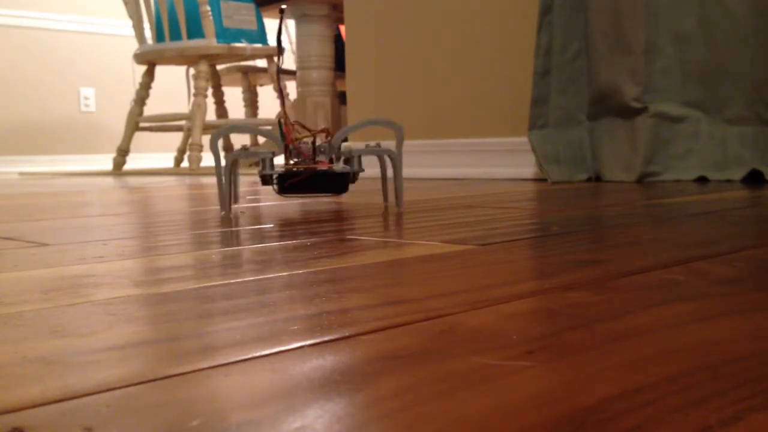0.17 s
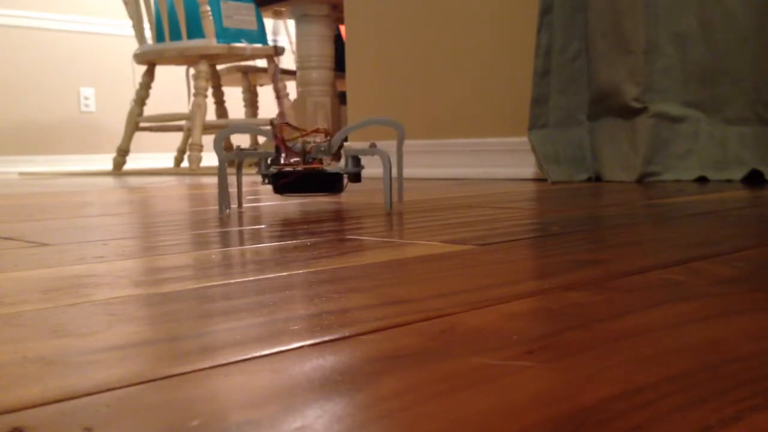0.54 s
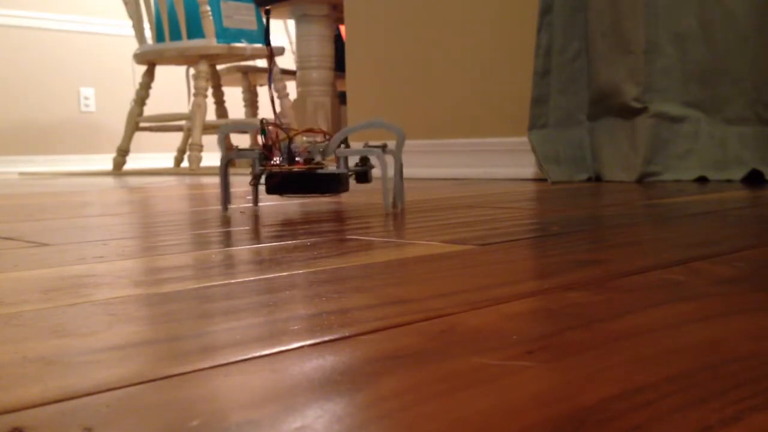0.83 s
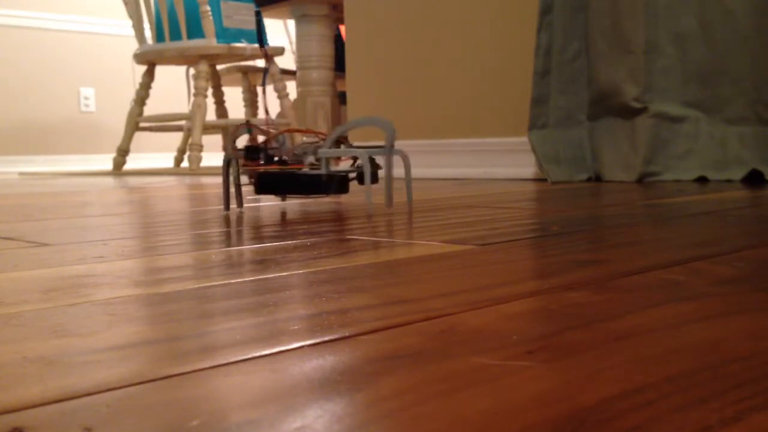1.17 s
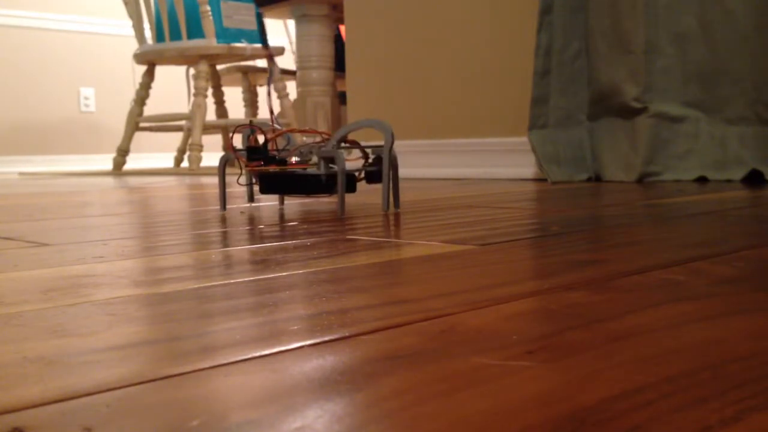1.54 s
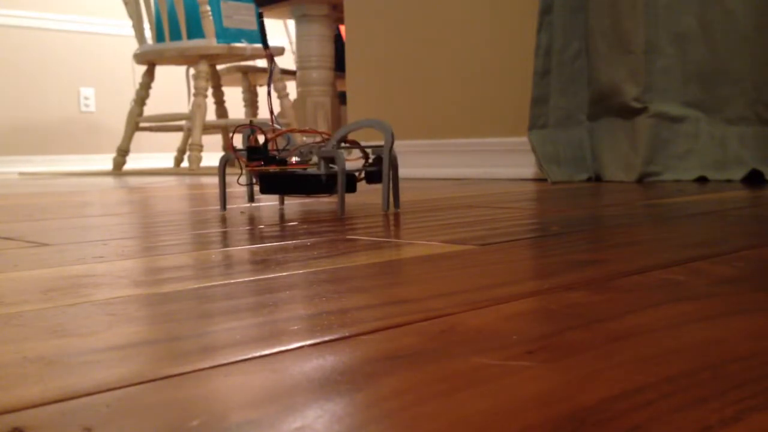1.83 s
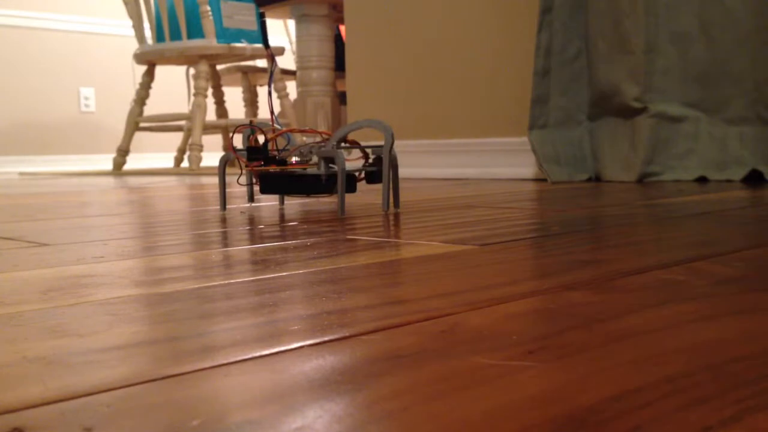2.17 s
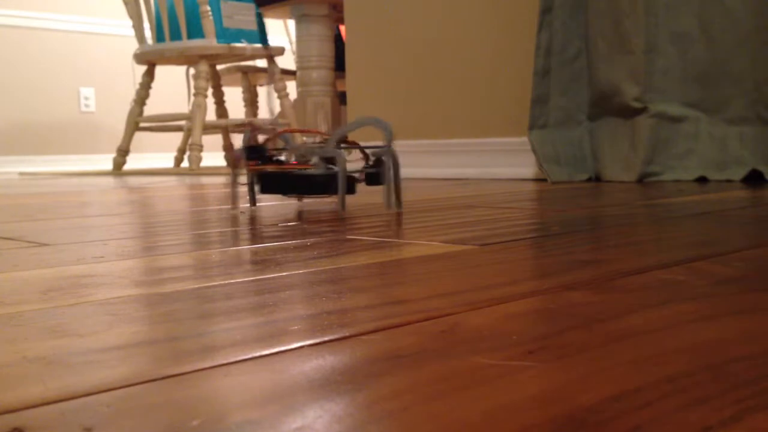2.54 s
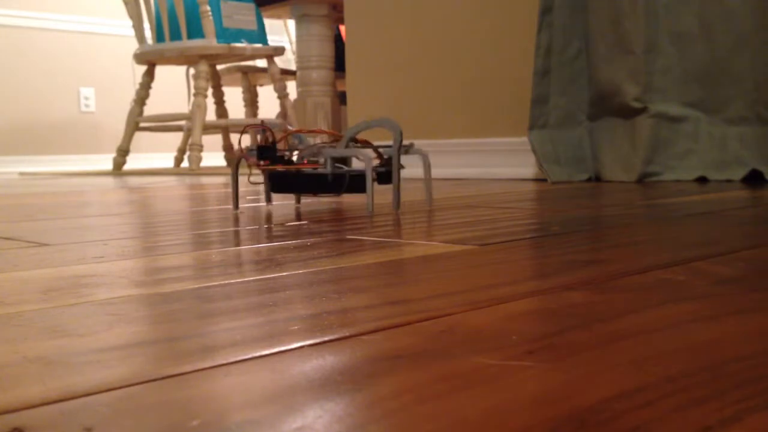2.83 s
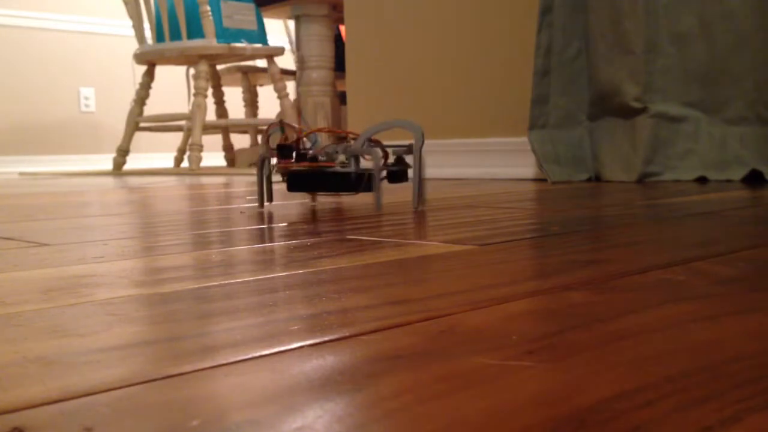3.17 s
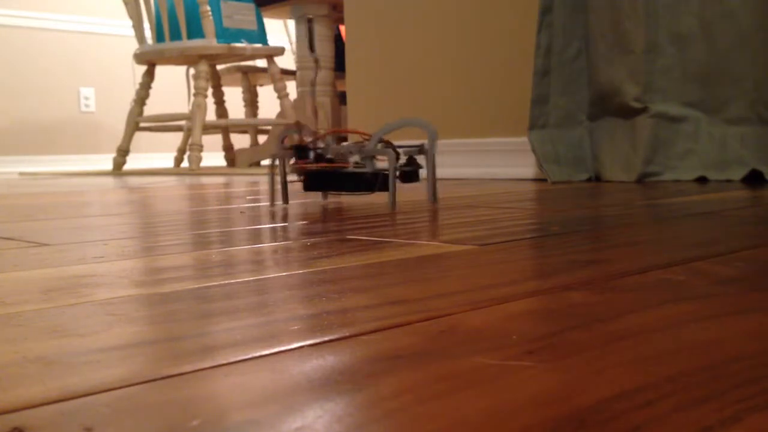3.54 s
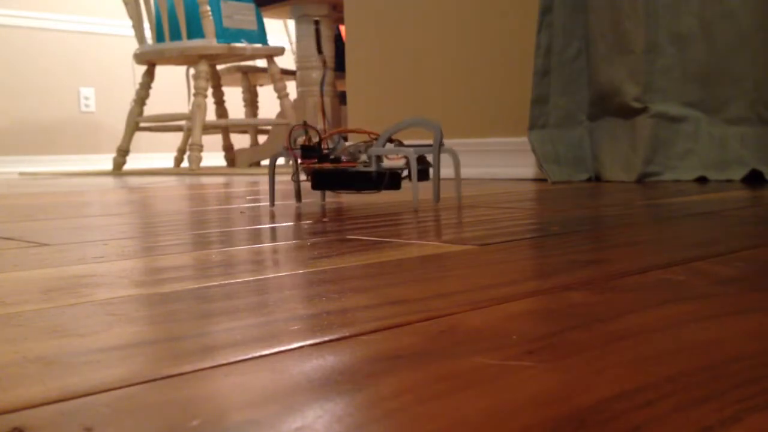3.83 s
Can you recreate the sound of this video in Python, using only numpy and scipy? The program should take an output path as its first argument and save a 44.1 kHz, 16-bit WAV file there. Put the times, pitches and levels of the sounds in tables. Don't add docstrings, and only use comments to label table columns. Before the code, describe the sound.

Small walking robot's servos whir in quick rasping, hissing bursts with a high whine; a short ticking pause, then louder strokes with foot taps and scrapes on a wooden floor, indoors, a metre or two from the microphone.

```python
import sys
import numpy as np
from scipy import signal
from scipy.fft import rfft, irfft, next_fast_len
from scipy.io import wavfile
from scipy.ndimage import uniform_filter1d, map_coordinates

SR = 44100
rng = np.random.default_rng(int(sys.argv[2]) if len(sys.argv) > 2 else 0)


def wrap_up_sound(samples):
    columns = np.atleast_2d(samples).T
    tamed = np.clip(columns, -1, 1)
    steps = np.round(tamed * 32767).astype(np.int16)
    wavfile.write(sys.argv[1], SR, steps)


def nominal_scale(level):
    x = np.asarray(level, float) / 20
    return 10 ** x


N = 176400
T = np.arange(N) / SR
ATTACK_S, RELEASE_S = 0.011, 0.011


def unit(x):
    return x / np.sqrt(np.mean(np.abs(x) ** 2) + 1e-20)


def along(points, hz):
    f, v = np.transpose(points)
    return np.interp(np.log(hz + 1), np.log(f + 1), v)


def wobble(rate):
    knots = rng.standard_normal(4 * 400 + 9)
    return map_coordinates(knots, [T * np.clip(rate, 0, 399)])


def filtered(x, response):
    m = next_fast_len(N + SR // 2)
    return irfft(rfft(x, m) * response(np.fft.rfftfreq(m, 1 / SR)), m)[..., :N]


def body(peaks):
    def response(f):
        total = 0
        for k, (hz, width, db) in enumerate(peaks):
            total = total + (-1) ** k * nominal_scale(db) * 1j * f * width / (hz * hz - f * f + 1j * f * width)
        return total
    return response


def grit(spiky_db, patchy_db):
    contacts = rng.standard_normal(N) * nominal_scale(spiky_db * rng.standard_normal(N))
    z = signal.stft(contacts, nperseg=256)[2]
    patches = uniform_filter1d(rng.standard_normal(z.shape), size=3, axis=0)
    patches = uniform_filter1d(patches, size=4, axis=1)
    return signal.istft(z * nominal_scale(patchy_db * unit(patches)), nperseg=256)[1][:N]


def gate(start, length, attack, release):
    return np.clip((T - start) / attack, 0, 1) * np.exp(-np.clip(T - start - length, 0, None) / release)


def air():
    # pitch_hz, level_db
    colour = [(18, -49), (30, -16.5), (123, -4.5), (219, -11.5), (399, -15), (767, -27.5), (2130, -28),
              (3230, -31), (15500, -38)]
    # pitch_hz, level_db
    hum = [(60, -67.5), (91.5, -63), (119, -61)]
    out = nominal_scale(-56) * unit(filtered(grit(0, 0.79), lambda f: nominal_scale(along(colour, f))))
    for hz, db in hum:
        drift = 1.05 * wobble(8)
        out += nominal_scale(db + 4 + 3.9 * wobble(9.44)) * np.sin(2 * np.pi * hz * T + drift)
    return out


def holding():
    frame_s = .02
    # start_s, pitch_hz, level_db
    ticks = [(.0122, 6800, -62), (.0189, 6800, -65), (.0189, 9700, -62)]
    out = np.zeros(N)
    for s, hz, db in ticks:
        t = (T - s) % frame_s
        frame = ((T - s) // frame_s).astype(int) + 1
        size = rng.standard_normal(203)[frame]
        ring = np.sin(2 * np.pi * hz * t) * np.exp(-t / 0.0011) * (1 - np.exp(-t / 0.00063))
        out += nominal_scale(db + 6.1 * size) * ring
    return out


def thuds():
    # start_s, level_db, pitch_hz
    drops = [
        (1.151, -38, 109.8),
        (1.194, -41, 70),
        (1.222, -32.5, 126),
        (2.517, -32.5, 139),
        (3.954, -44, 329),
    ]
    cycles = 0.63
    out = np.zeros(N)
    for s, db, hz in drops:
        fade = (T > s) * np.exp(-np.abs(T - s) * hz / cycles)
        out += nominal_scale(db) * np.sin(2 * np.pi * hz * (T - s)) * fade
    return out


def taps():
    # start_s, level_db, pitch_hz, time to fall 60 dB fade_s
    contacts = [(.64, -53.5, 850, .1), (.702, -43, 1970, 0.026), (1.034, -50.5, 1105, .06),
                (1.182, -42.5, 1370, 0.027), (1.349, -40, 1964, 0.028), (2.762, -53, 1388, .05),
                (2.861, -52, 800, .06), (3.01, -46, 1344, .08), (3.224, -48, 1970, .05),
                (3.258, -48, 943, 0.048), (3.34, -45.5, 958, 0.079), (3.352, -43, 513, 0.078),
                (3.5, -41, 2030, 0.034), (3.513, -46, 1275, .06), (2.51, -33.5, 2453, 0.078)]
    out, t = np.zeros(N + SR), np.arange(SR // 4) / SR
    for s, db, hz, t60 in contacts:
        ring = np.sin(2 * np.pi * hz * t)
        ring += 0.51 * np.sin(2 * np.pi * .7 * hz * t)
        ring += 0.32 * np.sin(2 * np.pi * 1.6 * hz * t)
        click = 0.84 * uniform_filter1d(rng.standard_normal(len(t)), size=5)
        hit = ring * (1 - np.exp(-t / 0.00033)) + click
        out[round(s * SR):][:len(t)] += nominal_scale(db - 60 * t / t60) * hit
    return out[:N]


def scrapes():
    # start_s, length_s, level_db, brightness in dB per octave tilt_db
    drags = [
        (1.188, .012, -41.5, -2.5),
        (1.208, 0.029, -48, 0),
        (2.077, .08, -62, 0.5),
        (2.475, 0.022, -34.5, -5),
        (2.508, 0.016, -32, 3),
        (2.532, 0.043, -38, 3),
        (2.591, 0.037, -37, -1.5),
        (2.628, 0.06, -47.5, 0.5),
        (2.937, 0.088, -57.5, -1.5),
        (3.866, 0.11, -53.5, 0),
    ]
    # pitch_hz, width_hz, level_db
    boards = [(247.7, 10, -3), (367, 25, 1.5), (516, 32, -2.5), (684, 120, -6.5), (966, 170, -8.5),
              (1430, 330, -13), (2390, 500, -13)]
    wood = filtered(grit(4, 2.1) * nominal_scale(3.5 * wobble(90)), body(boards))
    out = np.zeros(N)
    for s, length, db, tilt_db in drags:
        drag = unit(filtered(wood, lambda f: nominal_scale(tilt_db * np.log2((f + 50) / 500))))
        out += nominal_scale(db) * gate(s, length, 0.0025, 0.0058) * drag
    return out


def squeak():
    # start_s, length_s, top pitch_hz, level_db, share of pitch lost at the ends
    s, length, hz, db, sag = (2.606, .032, 2440, -41, .2)
    u = np.clip(2 * (T - s) / length - 1, -1, 1)
    turn = np.cumsum(hz * (1 - sag * u ** 2)) / SR
    return nominal_scale(db) * np.sqrt(1 - u ** 2) * np.sin(2 * np.pi * turn)


def twitches():
    # peak_s, level_db
    jerks = [(.062, -62), (.084, -53), (0.324, -48.5), (.564, -50.5), (.581, -55), (.801, -48.5),
             (1.065, -48), (1.081, -51), (1.3, -46), (1.326, -46.5), (2.676, -47.5), (2.941, -43.5),
             (2.961, -44), (3.176, -50), (3.446, -43), (3.46, -50), (3.945, -50.5)]
    width_s = 0.0051
    return sum(nominal_scale(db) * np.exp(-.5 * ((T - s) / width_s) ** 2 * np.where(T < s, 3, 1)) for s, db in jerks)


def nudges():
    # start_s, length_s, level_db
    walks = [
        (-.1, 1.55, -56),
        (2.36, 1.7, -54),
    ]
    return sum(nominal_scale(db + 1.1 * wobble(40)) * gate(s, length, ATTACK_S, RELEASE_S) for s, length, db in walks)


def strokes():
    # start_s, length_s, gear hiss level_db, drop at start_db, drop at end_db
    moves = [(-.1, 0.21, -42, 3, 30), (0.104, 0.15, -42.5, -0.5, -2.5), (.33, .2, -41.5, 5.5, 5),
             (0.597, 0.16, -41, 3.5, 2), (0.818, 0.21, -41, 5.5, 6), (1.094, 0.18, -39.5, 6, 8.5),
             (1.334, 0.14, -41, 5, 1), (2.354, 0.14, -40.5, 5, 7.5), (2.479, 0.16, -37.5, 4, 4),
             (2.709, .19, -39.5, 7, 5.5), (2.979, 0.16, -40.5, 1, 3), (3.212, 0.18, -38, 8.5, 4.5),
             (3.477, 0.17, -41.5, 2, 6.5), (3.711, 0.17, -37.5, 14.5, 3), (3.955, .15, -49, 4, 5)]
    # time of a pass at full speed_s, turns per s, rasp level_db
    tight_spots = [(.004, 30, -39), (.207, 60, -42), (.444, 55, -42), (0.702, 68, -39.5), (.941, 55, -39),
                   (1.216, 54, -38.5), (1.434, 54, -35), (2.435, 70, -62), (2.574, 60, -30),
                   (2.815, 52, -35.5), (3.066, 59.3, -32), (3.337, 61, -35.5), (3.553, 59, -32.5),
                   (3.814, 54, -38), (3.983, 34, -33.5)]
    # peak_s, pitch_hz, level_db
    whines = [(.0, 2550, -57), (.22, 2800, -54), (.46, 2830, -45), (.705, 2900, -49), (.962, 2840, -45),
              (1.205, 2850, -50), (1.452, 2700, -42), (2.43, 3050, -50), (2.615, 2650, -48),
              (2.82, 2640, -43), (3.075, 2520, -45), (3.325, 2720, -44), (3.587, 2790, -44),
              (3.84, 2720, -45), (3.985, 2350, -46)]
    narrow, scatter_db = 1.6, 1.2
    pulsing = .6
    arch_s, brake = .1, 1.6
    pitch_sag, rasp_fall_db, whine_fall_db = .17, 6, 4
    hiss, rasp, whine, hz, off_top = np.zeros((5, N))
    for (s, length, db, first_db, last_db), (top, rate, rasp_db), (peak, top_hz, whine_db) in zip(
            moves, tight_spots, whines):
        on = gate(s, length, ATTACK_S, RELEASE_S)
        drop_db = np.interp(T, [s, top, s + length], [first_db, 0, last_db])
        hiss += on * nominal_scale(db - drop_db)

        u = np.clip((T - top) / arch_s, -1.5, 1.5)
        turns = rate * arch_s * np.arctan(u)
        size = rng.standard_normal(41)
        pass_size = size[np.round(turns).astype(int) + 20] - size[20] / 2
        spot = np.exp(narrow * (np.cos(2 * np.pi * turns) - 1)) * nominal_scale(scatter_db * pass_size)
        rasp += on * spot * nominal_scale(rasp_db - drop_db - rasp_fall_db * u ** 2)

        v = np.clip((T - peak) / arch_s * np.where(T > peak, brake, 1), -1.5, 1.5) ** 2
        whine += on ** 3 * (1 - pulsing + pulsing * spot) * nominal_scale(whine_db - whine_fall_db * v)
        begun = T >= s
        hz[begun] = (top_hz * (1 - pitch_sag * v))[begun]
        off_top[begun] = v[begun]
    return hiss, rasp, whine, hz, off_top


def pinion_tone(hz, off_top):
    # multiple, level_db, blur_hz, extra fall off the top_db
    harmonics = [(1, -4, 80, 30), (2, 0, 330, 0), (3, -7, 390, 3)]
    turn = np.cumsum(hz + 45 * wobble(100)) / SR
    out = np.zeros(N)
    for k, db, blur, fall_db in harmonics:
        blurred = unit(2 / k ** 2 + wobble(blur) + 1j * wobble(blur))
        out += nominal_scale(db - fall_db * off_top) * (blurred * np.exp(2j * np.pi * k * turn)).real
    return out


def gear_colour(x):
    # pitch_hz, level_db per Hz
    sideways = [(300, -56), (700, -10), (1500, -8.5), (2700, -2.5), (3400, -5.5), (4300, -1.5), (8500, 0.5),
                (12800, -1), (15500, 4.5)]
    # pitch_hz, level_db per Hz
    facing = [(300, -69), (700, -14), (1500, -14), (2600, -10), (3300, -13.5), (4300, -2), (8800, -1),
              (12500, -5.5), (15500, -3.5)]
    before = unit(filtered(x, lambda f: nominal_scale(along(sideways, f))))
    after = unit(filtered(x, lambda f: nominal_scale(along(facing, f))))
    return np.where(T < 1.9, before, after)


def servos():
    # pitch_hz, width_hz, level_db
    case = [(4670, 490, -1.5), (7160, 410, 0), (7790, 270, 3), (8380, 400, 2), (9200, 250, 2),
            (10650, 950, -5), (12600, 530, -7)]
    hiss, rasp, whine, hz, off_top = strokes()
    rasp += twitches()
    hiss += nudges()
    knock = unit(filtered(grit(1.5, 2.2), body(case)))
    knock += .42 * gear_colour(grit(2.2, 2))
    mesh = gear_colour(grit(2.2, 2.2))
    out = hiss * nominal_scale(1.6 * wobble(60)) * mesh
    out += rasp * knock
    return out + whine * nominal_scale(1.3 * wobble(45.1)) * pinion_tone(hz, off_top)


def room(x):
    # pitch_hz, time to fall 60 dB fade_s
    decay = [(200, .4), (2000, .24), (12000, .15)]
    hz, t, z = signal.stft(rng.standard_normal(SR // 2), SR, nperseg=256)
    tail = signal.istft(z * nominal_scale(-60 * t / along(decay, hz)[:, None]), SR, nperseg=256)[1]
    late = np.pad(x, (200, 0))
    return signal.fftconvolve(late, tail / np.linalg.norm(tail))[:N]


def scene():
    robot = holding() + thuds() + taps() + scrapes() + squeak() + servos()
    return (robot + nominal_scale(-9.5) * room(robot) + air())[None]


def band_limit(x):
    return signal.sosfilt(signal.butter(12, 16350, fs=SR, output="sos"), x)


def record(dry):
    # pitch_hz, level_db
    dull = [(13300, 0.5), (13900, -3.5), (15500, -10)]
    low_hz, top_hz = 43.8, 15480

    def mic(f):
        return (f < top_hz) * nominal_scale(along(dull, f)) * (1j * f / (low_hz + 1j * f)) ** 2
    return band_limit(filtered(dry, mic))


dry = scene()
out = record(dry)
wrap_up_sound(out)
```